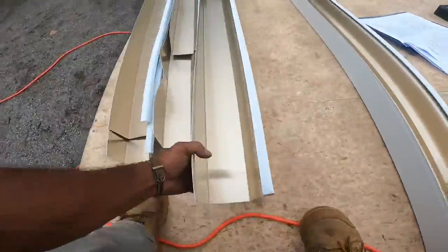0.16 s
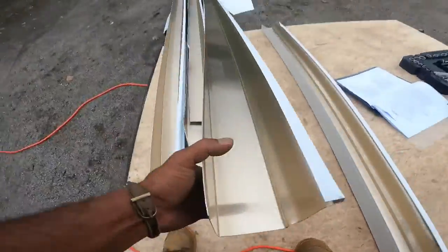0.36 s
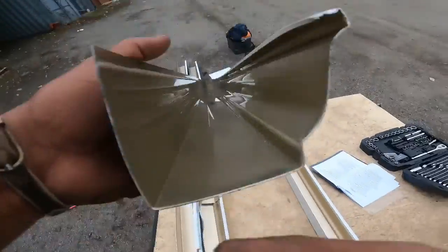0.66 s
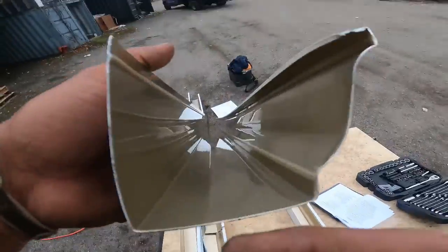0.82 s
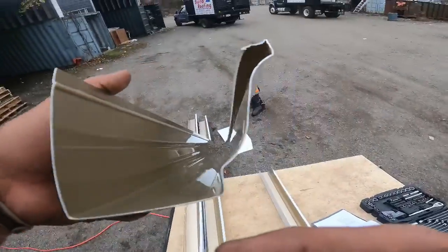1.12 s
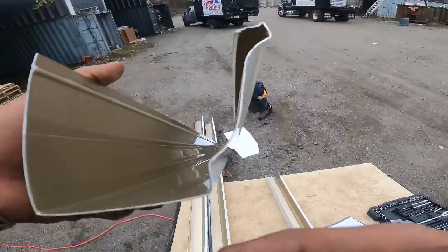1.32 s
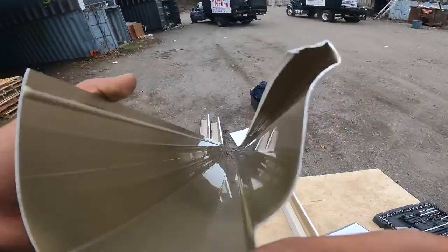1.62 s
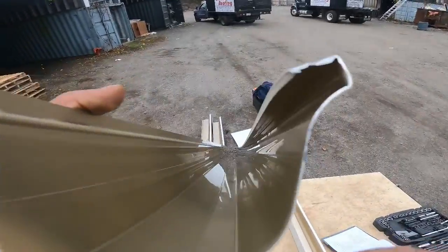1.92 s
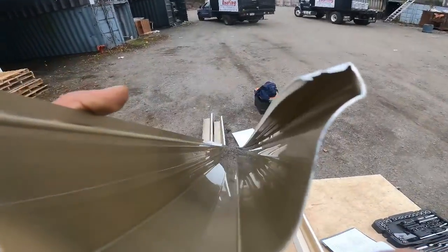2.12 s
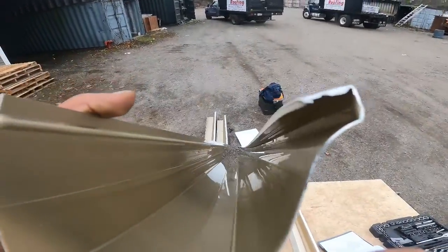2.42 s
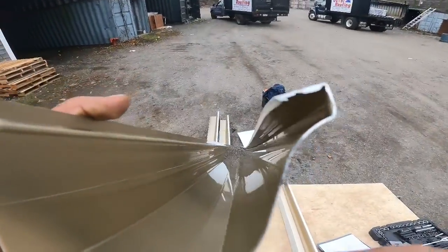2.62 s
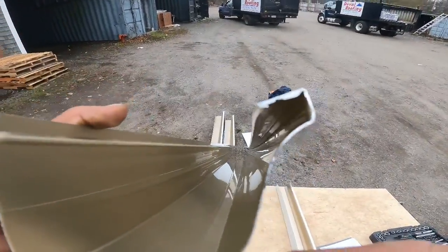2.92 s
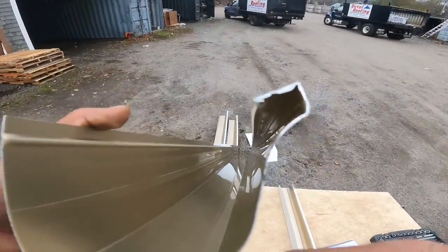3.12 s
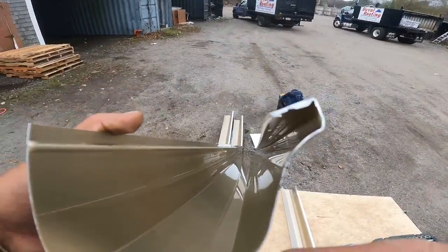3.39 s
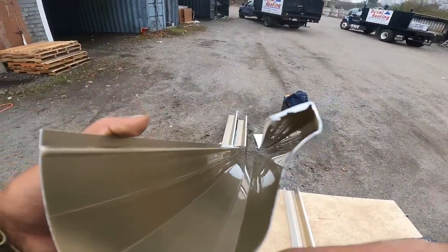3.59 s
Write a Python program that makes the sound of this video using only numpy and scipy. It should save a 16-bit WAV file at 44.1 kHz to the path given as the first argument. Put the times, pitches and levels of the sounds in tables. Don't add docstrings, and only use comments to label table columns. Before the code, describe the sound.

A thin sheet-metal gutter, nearly silent at first, is gripped at 0.1 s and scraped along a board. From 0.29 to 1.1 s come loud, irregular, springy knocks with gritty hiss, hollow ringing and grip rumble. Lighter ticks follow at 1.24, 1.61 and 1.77 s, then very faint ones; clearer ticks return at 3.0, 3.17 and 3.6 s. Low yard hum and faint wind lie underneath, close outdoors.

```python
import sys
import numpy as np
from scipy import signal
from scipy.fft import rfft, irfft, next_fast_len
from scipy.io import wavfile

SR = 44100
rng = np.random.default_rng(int(sys.argv[2]) if len(sys.argv) > 2 else 0)


def int16_out(signal):
    q = np.round(np.clip(np.atleast_2d(signal).T, -1, 1) * 32767)
    wavfile.write(sys.argv[1], SR, q.astype(np.int16))


def volts(x):
    e = np.asarray(x, float) / 20
    return 10 ** e


N = 165375
SIZE = 2 * next_fast_len(N // 2 + SR // 6)
HZ = np.arange(SIZE // 2 + 1) * SR / SIZE + 1e-3
SIDES = np.array([[1], [-1]])
LIFT_S = .6

# time in seconds, pressure in dB, rumble in the grip in dB,
# far-end chatter in dB.
DRAG = [
    (.102, -28, -45, -24),
    (.16, -20, -47, -47.5),
    (.24, -37.5, -41, -29),
    (.34, -19, -18, -15),
    (.39, -17.5, -32, -23.5),
    (.6, -22.5, -28, -23),
    (.72, -20, -24.5, -21),
    (.96, -24, -30, -24),
    (1.17, -48, -60, -47),
]
# frequency in Hz, level in dB, t60 in seconds.
PANEL = [(281.5, -16.5, 0.31), (438.5, -9.5, 0.304), (566.7, 0, 0.65), (862, -7.5, 0.51), (940, -11.5, .4),
         (970, -15, 0.54), (1057, -15, 0.47), (1180, -9.5, 0.22), (1760, -5, 0.39)]


def far_end(chatter_db):
    # time in seconds, peak in dB, sharp share in dB.
    knocks = [(0.1024, -31, -8), (0.1278, -29, 1), (0.2328, -22, 3), (0.2585, -19, -14), (0.2863, -2, -9.5),
              (0.338, -2, -34.5), (0.4009, -5.5, 1.5), (0.444, -6.5, -3.0), (0.4933, -8.5, 1),
              (0.5224, -5, -2.5), (0.5647, -5, -4.5), (0.6216, -7.5, 5), (0.684, -7.5, -19),
              (0.697, -16.5, -16.5), (0.7143, -11, 3.5), (0.735, -10.5, -14), (0.759, -17.5, 5),
              (0.7827, -4.5, -0.5), (0.8048, -16.5, 1), (0.8242, -16, 11), (0.894, -7, -16),
              (0.9351, -11.5, -2), (0.9628, -6.5, -0.5), (0.977, -20, 5), (1.0115, -12, -8),
              (1.0462, -30.5, -24), (1.0877, -15, -16), (1.107, -32, 8)]
    # time in seconds, peak in dB, dull share in dB, sharp share in dB.
    ticks = [(1.2068, -36, 8.5, 2.5), (1.238, -16, -6.5, 4), (1.2628, -21.5, -6, 3),
             (1.3948, -44.5, 1, 3.5), (1.4739, -30, -8, -3), (1.5406, -61.5, 11, 29), (1.5723, -31, 0, 3),
             (1.611, -18.5, -1, 2.5), (1.729, -57, 22, 18), (1.7475, -33.5, 12.5, 11.5),
             (1.7706, -19, -1, -3.5), (1.9, -43.5, 7.5, -2), (1.927, -60, -3.5, 16.5), (1.945, -56, 1.5, 6),
             (1.995, -63, -4, 11), (2.0642, -63, 1, 6), (2.1325, -31, -3, 6), (2.174, -32, 3, 4.5),
             (2.2613, -40.5, 12, 4), (2.276, -56, 0, 15), (2.2994, -42.5, 1, 0), (2.3376, -45, -4, 2),
             (2.3672, -36.5, 9, 2.5), (2.4141, -41.5, 1, 0), (2.5009, -45.5, -12, 8),
             (2.5392, -47, -0.5, 6), (2.6619, -50.5, 6, 13), (2.6815, -45.5, 15.5, 15),
             (2.804, -58.5, 1, 22), (2.83, -63, 5, 12.5), (2.8914, -63, -9, 17), (2.9437, -55, -4, 4.5),
             (2.918, -52, -3.5, 11), (2.9827, -43.5, 17, 7), (3.0169, -17, 0.5, -3.5),
             (3.1708, -18, 2.5, -1), (3.286, -49, 1, 0), (3.3289, -59, -4.5, 4), (3.519, -42.5, 18, 5),
             (3.5808, -42.5, 3, 9), (3.6066, -17.5, 2.5, -4.5), (3.6655, -48, -6, -6)]
    # start in seconds, length in seconds, level in dB.
    slip_rows = [(0.0, 0.0071, -47), (1.244, 0.28, -62), (3.007, 0.0117, -46), (3.568, 0.023, -67),
                 (1.712, 0.066, -46.5), (1.859, 0.15, -68.5), (2.136, 0.53, -67), (2.643, 0.055, -53.5),
                 (2.876, 0.13, -69), (3.259, 0.037, -57.5), (3.49, 0.074, -51)]
    bounce_s, splinter_s = .0025, .0015
    ease_s, cup_s = .47, 3.45
    t = np.arange(N) / SR

    impacts = [(s, db, -1.5, sharp_db) for s, db, sharp_db in knocks] + list(ticks)
    s, db, dull_db, sharp_db = np.transpose(impacts)
    luck = rng.random((len(s), 6)).T
    s = np.concatenate([s, s + bounce_s * luck[0], s + 3 * bounce_s * luck[1], s - 3 * bounce_s * luck[2]])
    loss_db = np.concatenate([0 * db, -3 - 6 * luck[3], -6 - 8 * luck[4], -16 - 8 * luck[5]])
    db, dull_db, sharp_db = np.tile([db, dull_db, sharp_db], 4)
    db = db + loss_db + 6.5

    chips = rng.random((len(s), 3, 5))
    lesser = np.arange(5) > 0
    late = splinter_s * (chips[:, 0] - .3) * lesser
    s = (s[:, None] + late).ravel()
    sign = np.sign(chips[:, 1] - .5).ravel()
    db = (db[:, None] - 2.5 - (8 + 8 * chips[:, 2]) * lesser).ravel()
    dull_db, sharp_db = np.repeat([dull_db, sharp_db], 5, axis=1)

    slips = np.zeros(N)
    for start, length, level_db in slip_rows:
        rise = np.clip((t - start) / (1.34 * length), 0, 1)
        fall = np.clip((start + length - t) / (0.29 * length), 0, 1)
        slips = slips + volts(level_db) * rise * fall
    surges_db = 5.5 * drift(25)
    clicks = (volts(chatter_db - 17 + surges_db) + slips) * grains(240, 3.0)

    is_knock = s < DRAG[-1][0]
    bass = low(2700)
    sharp = 1 / (1 + (6000 / HZ) ** 4)
    bands = [(np.where(is_knock, -4.5, 0), (1 - bass) * (1 - sharp)),
             (np.where(is_knock, 1.5, -2), peak(4170, 750)),
             (dull_db, bass),
             (sharp_db, sharp)]
    for share_db, band in bands:
        clicks = clicks + through(train(s, db + share_db, sign), band)

    free = trough(1)
    cupped = free * (1 - 0.85 * peak(4210, 450)) * (1 + 1.3 * peak(2500, 600)) * (1 - 0.49 * peak(2100, 500))
    ways = [trough(0.89), trough(0.92), free, cupped]
    stage = np.searchsorted([ease_s, LIFT_S, cup_s], t)
    body_modes = [(hz, 60.0, mode_db) for hz, mode_db, t60 in PANEL[2:]]
    out = through(train(s, db + dull_db + 13, sign), panel(body_modes))
    for k, way in enumerate(ways):
        out = out + through(clicks * (stage == k), way)
    return out


def trough(shift):
    # travel in seconds at 4 kHz, level in dB, left lean in dB.
    fold_paths = [(.0030, 4.5, 4), (.0062, -1.5, 8), (.0088, -2.5, -12.5)]
    # frequency in Hz, width in Hz, level in dB.
    resonances = [(1200, 102, 10), (1746, 65, 16), (2007, 63, 15.5), (2939, 75, 17), (3800, 94, 9.5),
                  (4206, 148, 21), (4460, 55, 14), (6520, 920, 4), (9490, 400, 7.5)]
    # frequency in Hz, level in dB.
    colour = [(800, -3), (2000, -3), (4000, -6), (7000, -4), (10000, -12.5), (13000, -14.5), (16000, -49)]
    dispersion, lead_s = 1.4, .0015
    direct = sum(volts(db + lean_db * SIDES / 2) * travel(s, dispersion) for s, db, lean_db in fold_paths)
    echoes = 1 / (1 - volts(-15) * travel(.018, .6))

    t = np.arange(SR // 3) / SR
    mid, side = rng.standard_normal((2, len(t))) * (1 - np.exp(-t / .012))
    hiss = volts(-23.5) * (mid + 0.29 * side * SIDES) * volts(1.0 * SIDES)
    bass = low(2460)
    treble = 1 / (1 + (7000 / HZ) ** 4)
    middle_tail = rfft(hiss * volts(-60 * t / .16), SIZE)
    bass_tail = rfft(hiss * volts(-60 * t / .34), SIZE)
    treble_tail = rfft(hiss * volts(5.5 - 60 * t / .084), SIZE)
    scatter = middle_tail * (1 - bass) + bass_tail * bass
    scatter = scatter * (1 - treble) + treble_tail * treble

    power = 1 + sum(abs(volts(db) * peak(hz * shift, width / shift ** 4)) ** 2 for hz, width, db in resonances)
    cepstrum = np.fft.ifft(np.log(np.sqrt(np.concatenate([power, power[-2:0:-1]])))).real
    cepstrum[1:len(power) - 1] *= 2
    bumps = rfft(cepstrum[:len(power)], SIZE)

    guided = direct * echoes * shift ** 6 / (1 + (2500 / HZ) ** 5) * np.exp(bumps)
    diffuse = volts(5.5) * scatter * np.exp(0.73 * bumps) * travel(fold_paths[0][0] / 2, dispersion)
    lead = np.exp(2j * np.pi * HZ * lead_s)
    return (guided + diffuse) / (1 + (400 / HZ) ** 4) * volts(at_hz(colour, HZ)) * lead


def travel(seconds, power):
    ratio = np.maximum(HZ, 500) / 4000
    cycles = 4000 * (ratio ** (1 - power) - 8 ** (power - 1)) / (1 - power)
    return np.exp(-2j * np.pi * seconds * cycles)


def panel(modes):
    return sum((1 + 0.22 * rng.standard_normal((2, 1))) * volts(db) * peak(hz, width) for hz, width, db in modes)


def near_end(pressure_db, chatter_db):
    # time in seconds, peak in dB.
    tap_rows = [
        (0.107, -22.5),
        (0.668, -10.5),
        (3.519, -23.5),
    ]
    # frequency in Hz, level in dB.
    grit_spectrum = [(88, -50.5), (150, -15.5), (1010, -5), (1200, -4), (1950, -15.5), (3970, -13),
                     (9000, -36.5), (15000, -72)]
    # frequency in Hz, width in Hz, level in dB.
    pressed_modes = [(309, 29, -1.5), (595, 120, -3), (901, 41, -3.5), (1195, 76, 1), (1757, 41, -5),
                     (2575, 43, -6.5), (2910, 24, -11.5)]
    # frequency in Hz, level in dB, t60 in seconds.
    parting_rings = [(899, -41.5, 2), (976, -50, 4.4)]
    t = np.arange(N) / SR
    s, db = np.transpose(tap_rows)
    burst = rng.standard_normal(SR // 8) * volts(-60 * t[:SR // 8] / .33)
    taps = through(train(s, db + 4), rfft(burst, SIZE) * low(810) * (1 - low(186)))
    hiss_db = (pressure_db + chatter_db) / 2 - 6.5 + 2.3 * drift(13.5)
    out = volts(1.5) * taps + volts(hiss_db) * noise(grit_spectrum, patchy_db=4.5, likeness=0.84)

    since = np.maximum(t - .75, 0)
    for hz, db, t60 in parting_rings:
        level = volts(db - 60 * since / t60 + 1.3 * drift(8)) * np.minimum(since / 0.033, 1)
        out = out + level * np.sin(2 * np.pi * hz * t)

    free = np.clip((t - LIFT_S) / 0.34 + .5, .1, 1)
    for k in range(3):
        shake = volts(pressure_db + 4.2 * drift(10.3)) * grains(2500, 2.7)
        rings = []
        for hz, db, t60 in PANEL[k::3]:
            rings += [(hz, 2.3 / t60, db + 10), (hz * 1.02, 30.0, db - 0.5)]
        out = out + through(volts(11.5) * shake * free + taps, panel(rings))
        out = out + through(volts(13.5) * shake * (1.1 - free), panel(pressed_modes[k::3]))
    return out


def rumble(grip_db, wind_db):
    mid, side = through(rng.standard_normal((2, N)), low(89) * (1 - low(26)))
    pair = rms_one(mid + 0.265 * side * SIDES)
    return pair * volts(3.15 * drift(9.3)) * (volts(wind_db) + volts(grip_db - 2.5))


def yard(hum_db):
    # frequency in Hz, level in dB per Hz.
    yard_spectrum = [(12, -32.5), (20, -17), (84, 1.5), (398, -15), (818, -13.5), (3270, -35),
                     (4200, -38.5), (9900, -47), (15000, -81)]
    # frequency in Hz, likeness from 0 to 1.
    alike_rows = [(60, 1), (950, 0.8), (15000, 0.1)]
    return volts(hum_db + 3.5) * noise(yard_spectrum, patchy_db=3.5, likeness=at_hz(alike_rows, HZ))


def noise(spectrum, patchy_db, likeness):
    mid, side = rfft(rng.standard_normal((2, N)), SIZE)
    alike = np.clip(likeness, 0, 1)
    pair = volts(at_hz(spectrum, HZ)) * (np.sqrt(1 + alike) * mid + np.sqrt(1 - alike) * side * SIDES)
    place = np.clip(np.log2(HZ / 60) / 2, 0, 4)
    out = 0
    for k in range(5):
        band = irfft(pair * np.maximum(1 - abs(place - k), 0), SIZE)[:, :N]
        out = out + band * volts(patchy_db * drift(5.0))
    return rms_one(out)


def grains(per_s, spread_db):
    sizes = volts(spread_db * np.minimum(rng.exponential(1, N), 4)) * rng.choice([-1, 1], N)
    return rms_one(sizes * (rng.random(N) < per_s / SR))


def train(s, db, sign=1):
    out = np.zeros(N)
    np.add.at(out, (np.array(s) * SR).astype(int), sign * volts(np.array(db)))
    return out


def drift(rate):
    r = np.exp(-128 * np.pi * rate / SR)
    slow = signal.lfilter([1], [1, -2 * r, r * r], rng.standard_normal(N // 64 + 1002))[1000:]
    return np.interp(np.arange(N) / 64, np.arange(len(slow)), rms_one(slow))


def peak(hz, width_hz):
    return 1j * HZ * width_hz / (hz ** 2 - HZ ** 2 + 1j * HZ * width_hz)


def low(hz):
    return 1 / (1 + 1j * HZ / hz) ** 2


def through(x, response):
    return irfft(rfft(x, SIZE) * response, SIZE)[..., :N]


def at_hz(points, hz):
    return np.interp(np.log(hz), np.log(np.array(points)[:, 0]), np.array(points)[:, 1])


def in_time(rows):
    s, *columns = np.transpose(rows)
    return [np.interp(np.arange(N) / SR, s, c) for c in columns]


def rms_one(x):
    return x / np.sqrt(np.mean(x ** 2) + 1e-20)


def scene():
    # time in seconds, hum in dB, wind in dB.
    swell = [
        (0, -46, -30),
        (.1, -40.5, -45),
        (1.3, -59.5, -43.5),
        (1.9, -50.5, -48.5),
        (2.3, -50, -42),
        (2.9, -49.5, -55.5),
        (3.75, -47.5, -43.5),
    ]
    t = np.arange(N) / SR
    begin_s, end_s = DRAG[0][0], DRAG[-1][0]
    pressure_db, grip_db, chatter_db = in_time(DRAG)
    hum_db, wind_db = in_time(swell)
    on = np.clip((t - begin_s) / 0.0027, 0, 1) * np.clip((end_s + 0.078 - t) / 0.031, 0, 1) + 1e-4
    gate_db = 20 * np.log10(on)
    let_go_db = -60 * np.maximum(t - end_s, 0)
    far = far_end(chatter_db + gate_db)
    near = near_end(pressure_db + gate_db, chatter_db + gate_db)
    return far + near + rumble(grip_db + let_go_db, wind_db) + yard(hum_db)


def roll_off(x):
    return signal.sosfilt(signal.butter(12, 15800, fs=SR, output="sos"), x)


def record(dry):
    lag = np.exp(-2j * np.pi * HZ / SR / (1 + (HZ / 6000) ** 2))
    late = through(dry, np.stack([lag, lag ** 0]))
    rounded = 1.057 * np.tanh(late / 0.79)
    mix = through(rounded, 1 / (1 + (HZ / 14500) ** 12))
    return roll_off(mix)


dry = scene()
out = record(dry)
int16_out(out)
```